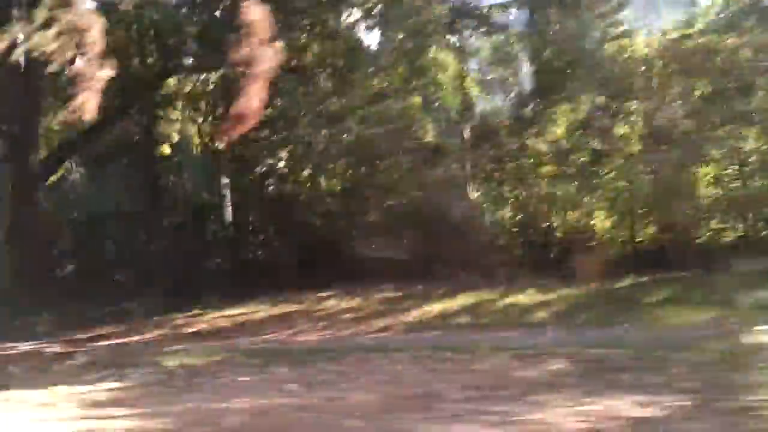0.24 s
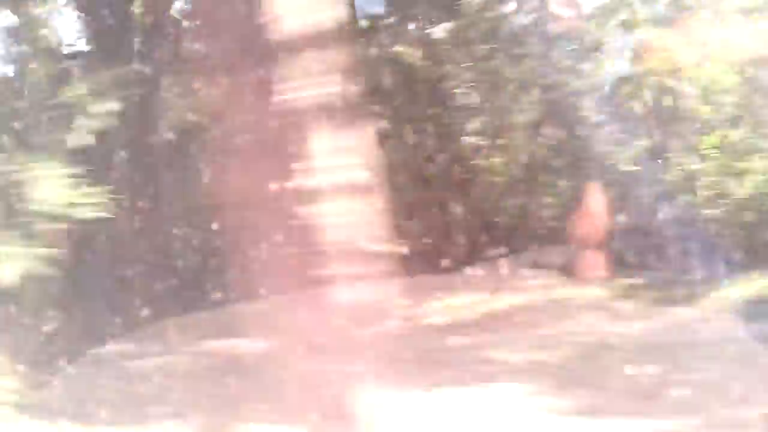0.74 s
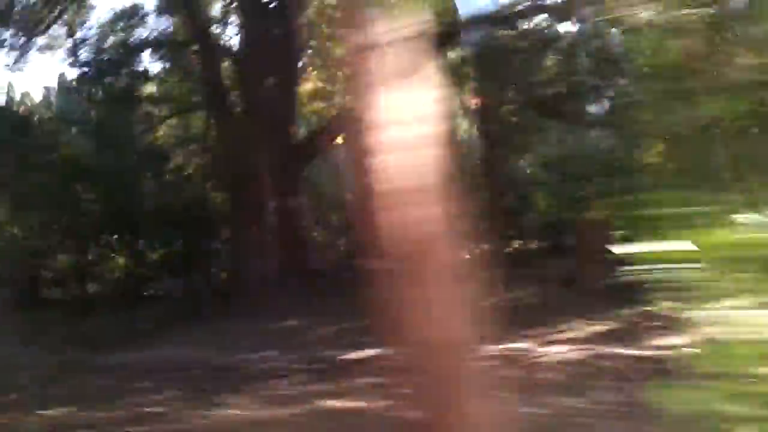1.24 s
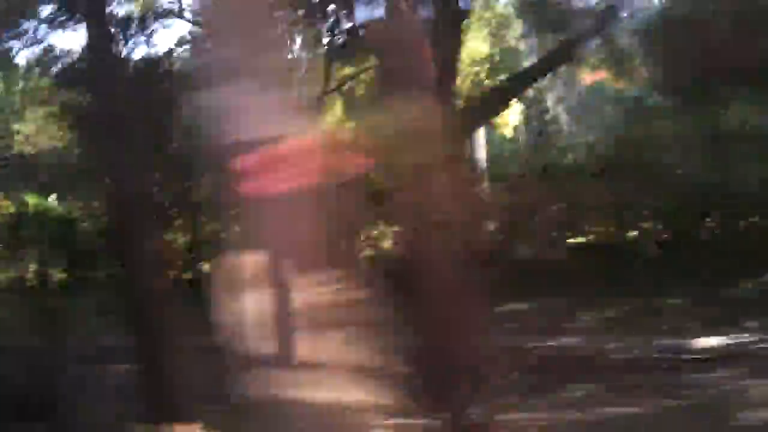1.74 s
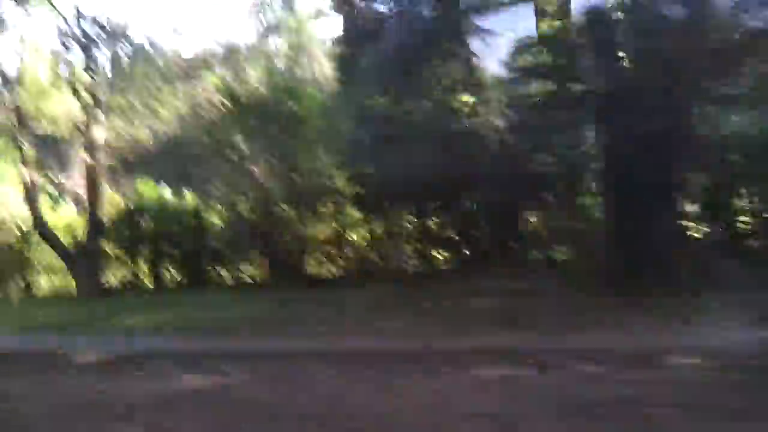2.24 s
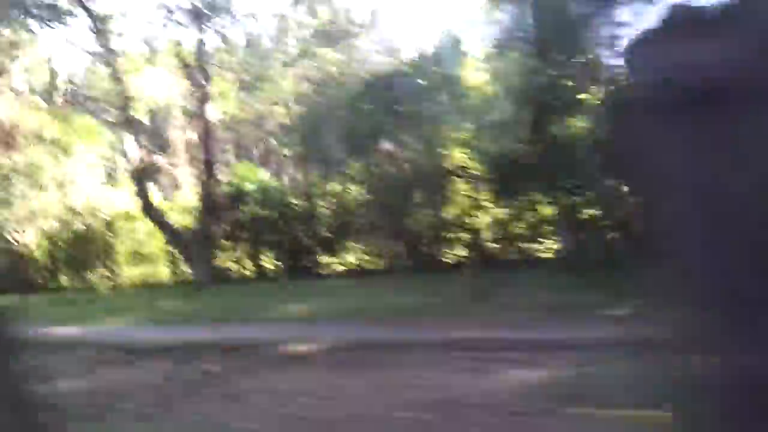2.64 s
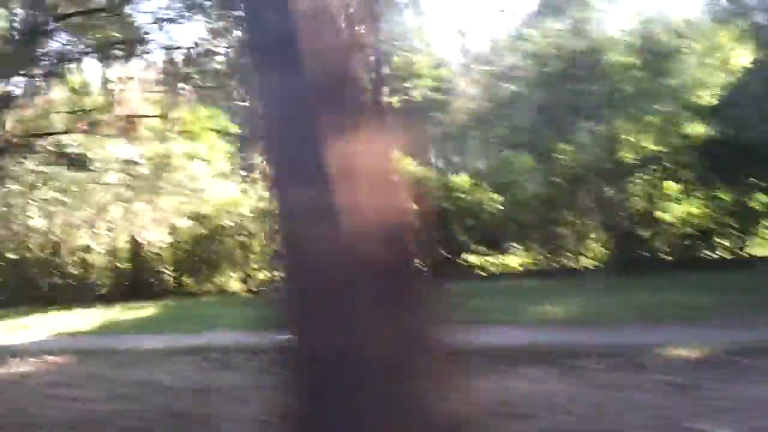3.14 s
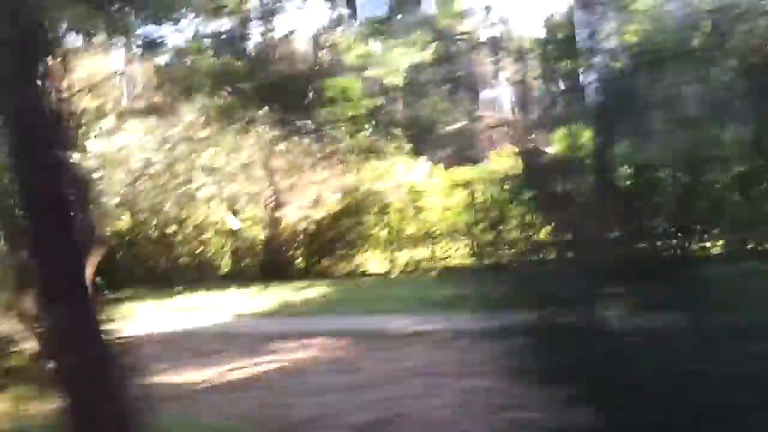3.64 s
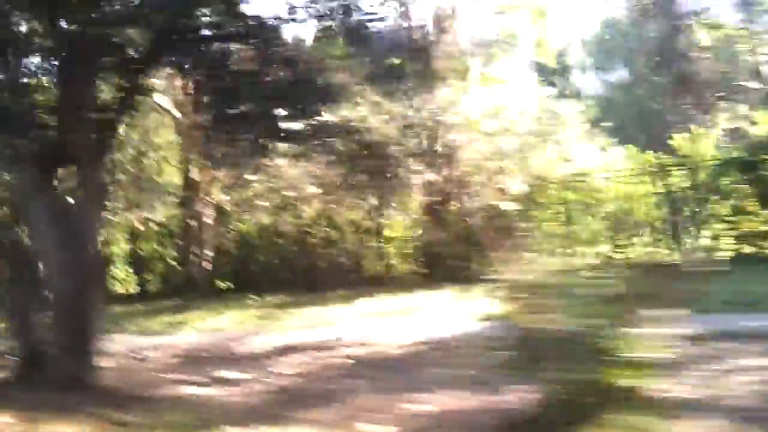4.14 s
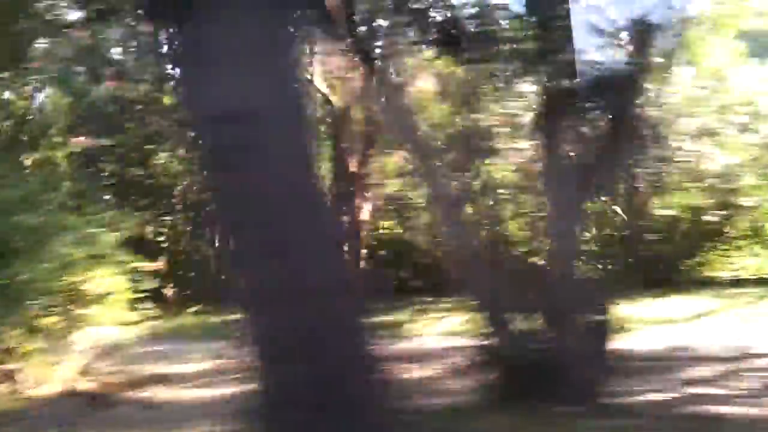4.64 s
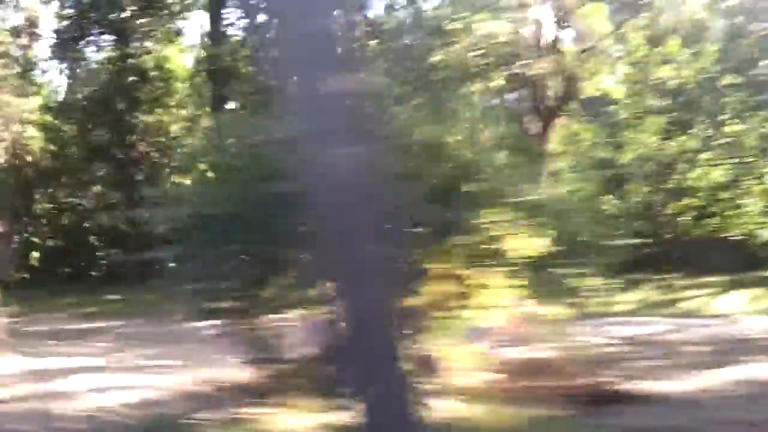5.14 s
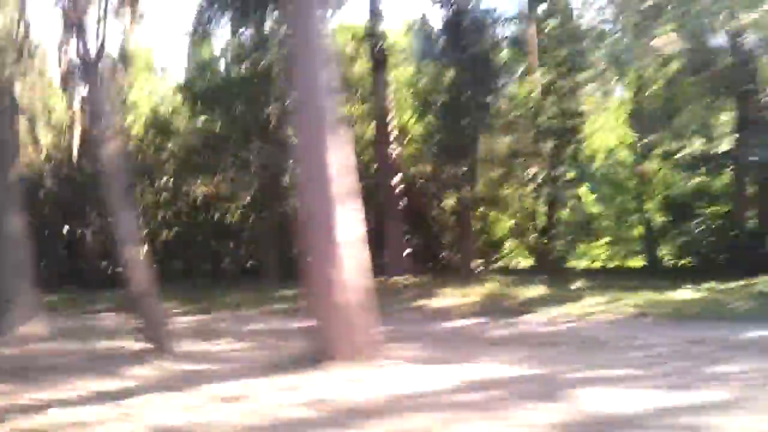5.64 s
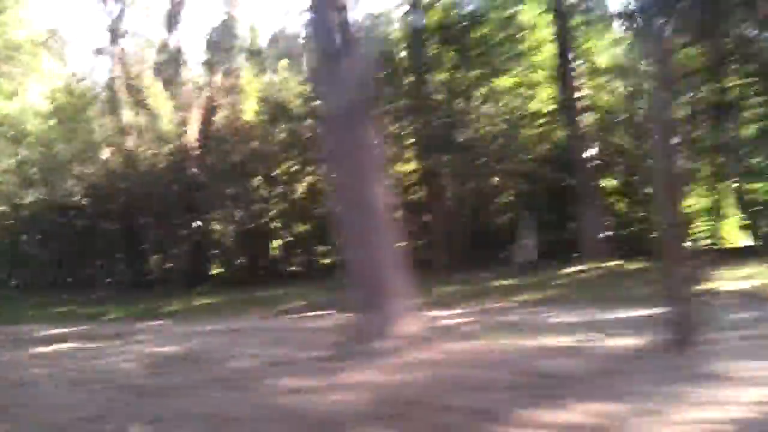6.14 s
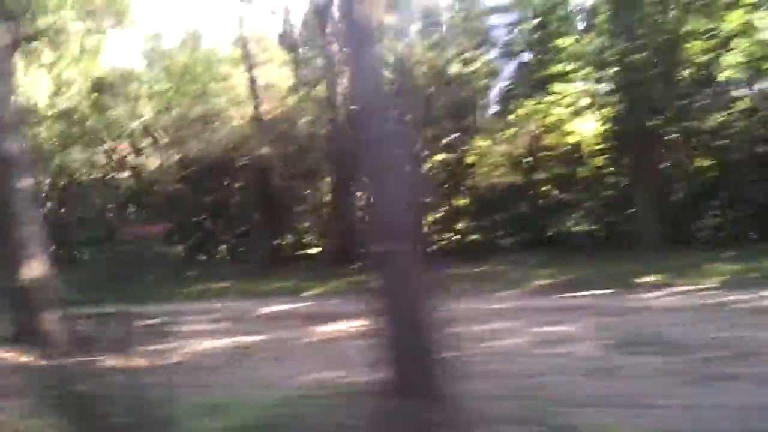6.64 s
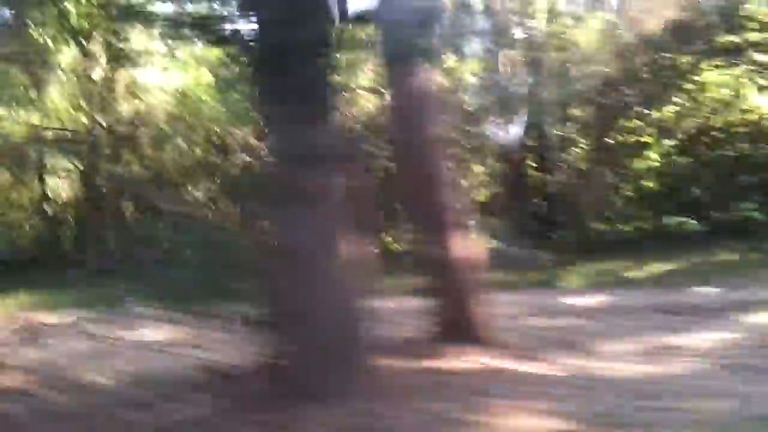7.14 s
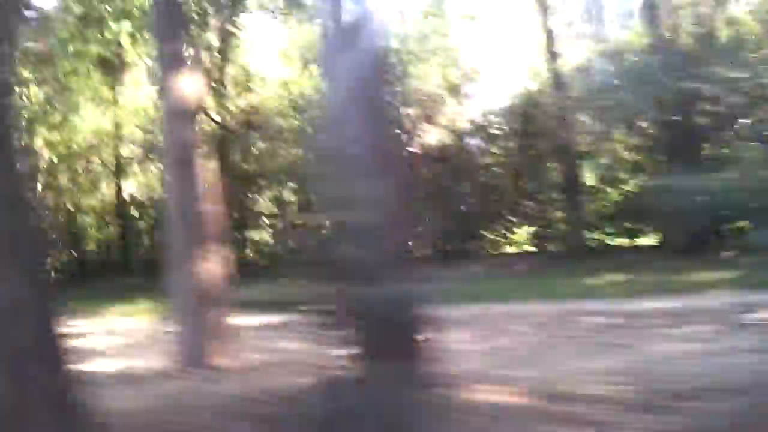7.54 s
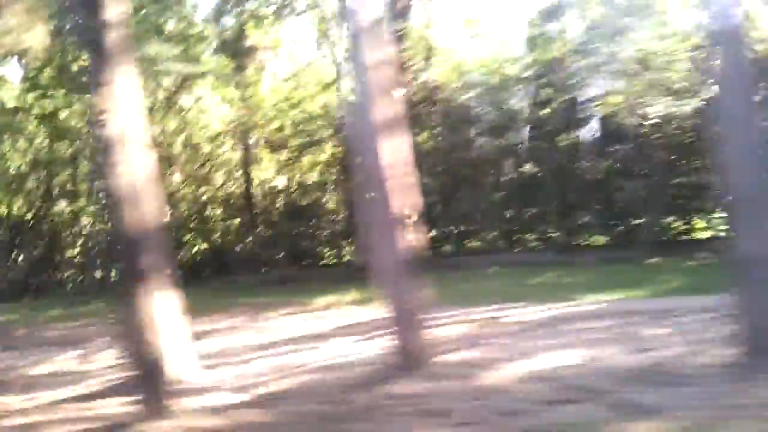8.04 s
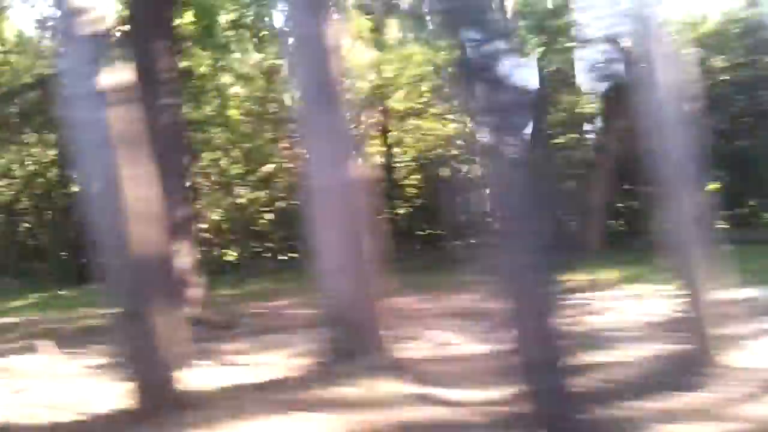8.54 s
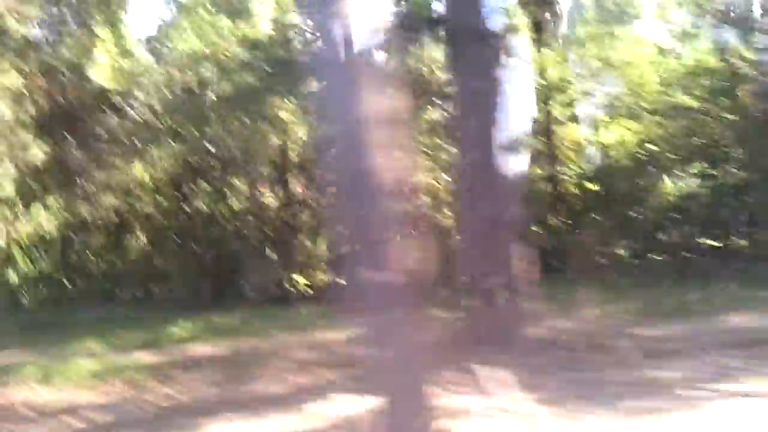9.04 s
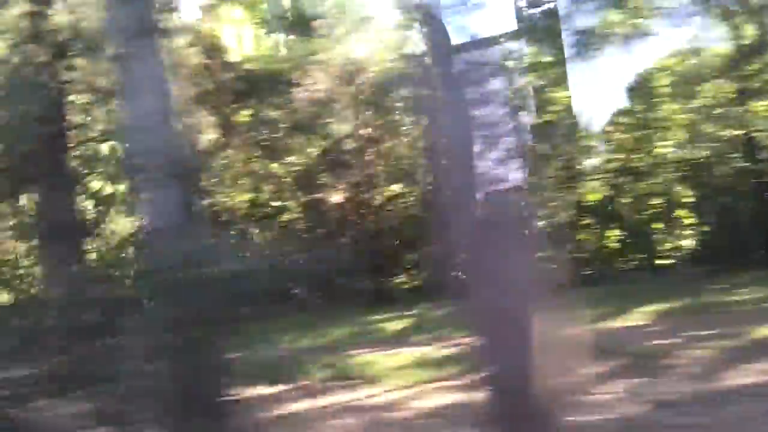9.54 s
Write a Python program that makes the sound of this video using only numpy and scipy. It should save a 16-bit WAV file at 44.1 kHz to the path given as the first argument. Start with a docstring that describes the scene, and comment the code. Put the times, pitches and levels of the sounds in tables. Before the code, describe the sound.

Continuous electric drive hum wavers restlessly, its pitch almost constant, blended with dull road roar in a boxy metal cabin. Irregular soft thuds and quick fluttering rattles run throughout, sheets ringing briefly. Rattling is dense at first, thinner around the middle, bursts hard after five seconds, then settles into lighter knocks, small creaks and occasional glassy ticks. Heard from inside by a small two-port microphone, with no speech.

```python
"""Trolleybus cabin at near-steady speed

The drive hums at multiples of its shaft speed over road rumble in the boxy cabin. About once a wheel turn a thud
booms in the floor and clatters the side walls. Wheel hops, in runs of about ten a second or singly, shake panels
and fittings; sheets ring, parts tick on the window pane, a wall joint creaks and a fitting squeaks now and then.
Tones are sines, knocks and rumble are shaped noise; two microphone ports hear them all."""
import sys
import numpy as np
from scipy import signal
from scipy.fft import rfft, irfft, next_fast_len
from scipy.io import wavfile
from scipy.ndimage import uniform_filter1d

SR = 44100
rng = np.random.default_rng(int(sys.argv[2]) if len(sys.argv) > 2 else 0)


def int16_out(signal):
    """Quantize to a 16-bit WAV file."""
    q = np.round(np.clip(np.atleast_2d(signal).T, -1, 1) * 32767)
    wavfile.write(sys.argv[1], SR, q.astype(np.int16))


N = 430857
FFT_SAMPLES = next_fast_len(N + 4096)
FREQ_HZ = np.fft.rfftfreq(FFT_SAMPLES, 1 / SR)
TIME_S = np.arange(N) / SR

# Drive shaft. Each row: time in seconds, shaft speed in Hz.
SHAFT_SPEED = [(0, 27.8), (.8, 28.29), (1.6, 28.45), (2.2, 28.71), (2.8, 28.62), (3.5, 28.41), (4.1, 28.29),
               (4.6, 28.16), (5.1, 28.36), (6, 28.07), (7, 27.91), (7.5, 28.03), (8.2, 27.99), (9, 28.07),
               (9.77, 27.81)]
# Tone frequency of each drive tone, as a multiple of shaft speed.
SHAFT_MULTIPLES = (6, 8, 12, 15.1, 19, 24.1, 48)
# Level curve each tone follows: 0 is MAIN_HUM, 1 to 4 the level columns of OTHER_TONES.
LEVEL_CURVE = (1, 0, 2, 3, 4, 4, 4)
# How far each tone lies under its curve, in dB.
TONE_BELOW_DB = (0, 0, 0, 0, 6, 0, 15)
# Slow swelling of each tone, in dB.
TONE_SWAY_DB = (1.5, .5, .5, 0, 2, 2.5, 2)
# Share of the wavering each tone takes up, as a factor.
TONE_UNREST = (1.2, .6, .8, .25, .45, .6, 1)
# Main hum level, beating unevenly, in three stretches. Each row: time in seconds, rms in dB before wavering.
MAIN_HUM = [
    [(0.0, -27), (0.04, -24), (0.07, -36), (0.1, -19), (0.12, -25), (0.14, -45), (0.19, -47), (0.25, -23),
     (0.37, -26), (0.39, -38), (0.43, -24), (0.51, -25), (0.58, -44), (0.63, -28.5), (0.99, -25),
     (1.01, -29), (1.04, -17), (1.1, -27), (1.19, -18), (1.27, -29), (1.39, -15), (1.44, -28), (1.47, -16),
     (1.52, -32), (1.57, -16), (1.71, -29), (1.88, -23), (1.95, -14), (1.99, -19.5), (2.14, -15),
     (2.17, -27), (2.26, -17.5), (2.34, -31), (2.43, -20), (2.46, -37), (2.51, -21), (2.76, -18.5),
     (2.81, -29), (2.94, -17.5), (3.0, -18)],
    [(3.04, -23), (3.11, -28), (3.15, -17), (3.35, -29), (3.39, -16), (3.51, -18.5), (3.55, -27),
     (3.65, -12.5), (3.71, -31), (3.77, -12), (3.86, -26), (3.91, -22), (3.96, -32), (4.02, -19.5),
     (4.07, -27.5), (4.2, -19), (4.29, -28), (4.37, -18.5), (4.42, -32), (4.54, -18), (4.56, -24),
     (4.75, -25), (4.8, -19), (4.83, -32), (4.9, -18), (4.97, -18), (5.05, -24), (5.08, -45), (5.14, -27),
     (5.23, -27), (5.29, -21), (5.35, -24), (5.41, -16), (5.46, -28), (5.58, -17), (5.62, -41), (5.64, -24),
     (5.9, -31), (5.96, -18), (6.0, -25)],
    [(6.04, -25), (6.11, -25), (6.17, -43), (6.21, -28), (6.5, -23.5), (6.56, -43), (6.59, -19),
     (6.67, -42), (6.72, -26), (6.91, -22), (6.94, -34), (7.03, -21), (7.15, -32), (7.18, -21), (7.45, -26),
     (7.49, -45), (7.51, -34), (7.67, -28), (7.91, -48), (7.97, -21), (8.03, -28), (8.09, -45), (8.11, -30),
     (8.24, -22), (8.26, -41), (8.34, -21), (8.61, -30.5), (8.75, -44), (8.78, -32), (8.93, -29),
     (8.97, -45), (9.0, -29), (9.2, -27), (9.23, -47), (9.45, -25), (9.49, -45), (9.53, -20), (9.6, -45),
     (9.7, -26), (9.77, -47)],
]
# Levels of the other drive tones, rising and falling unevenly. Each row: time in seconds, then rms in dB
# before wavering of the low hum, the overtone, the lower gear whine and the upper gear whine.
OTHER_TONES = [(0.0, -27, -24, -38, -41), (0.08, -18, -41, -40, -34), (0.11, -21.5, -27, -40, -43),
               (0.46, -23, -34, -33, -38.5), (0.6, -36, -33, -45, -39), (0.65, -29, -27, -36, -38),
               (0.92, -25, -32, -31, -39), (0.98, -38, -31, -36, -38), (1.14, -28, -32, -30, -33),
               (1.22, -32, -21.5, -27, -35), (1.28, -31, -41, -37, -32), (1.36, -32, -24.5, -35, -40),
               (1.5, -24, -39, -28, -32), (1.52, -35, -30, -32, -30), (1.74, -24, -26, -29.5, -30.5),
               (1.85, -36, -31, -34, -40), (1.96, -22, -23, -26, -32), (2.23, -32, -36, -27.5, -42),
               (2.39, -25.5, -21, -25.5, -31), (2.61, -39, -29, -31, -41.5), (2.69, -32, -19.5, -30, -31),
               (2.83, -30, -31, -32, -38), (2.86, -26, -31, -43, -33), (2.91, -42, -41, -31, -33),
               (3.04, -30, -21, -27, -32), (3.13, -34, -29, -26, -30.5), (3.83, -31, -22.5, -28, -31.5),
               (4.08, -43, -30, -31, -37), (4.22, -31, -20, -26, -25), (4.33, -33, -28, -36, -30.5),
               (4.73, -28, -27.5, -32, -34.5), (5.03, -40, -28, -29.5, -31), (5.06, -35, -26, -40, -41),
               (5.12, -28, -33, -42, -37), (5.25, -27, -23, -34, -29), (5.36, -43, -26, -26, -39),
               (5.49, -26, -33, -29, -32), (6.17, -31.5, -28.5, -31, -36), (6.26, -26, -22, -31, -30),
               (6.28, -25.5, -29, -28.5, -35), (6.72, -44, -29, -31.5, -38), (6.88, -30, -25, -33, -33),
               (7.16, -39, -32, -31, -41), (7.21, -25, -25, -26, -28), (7.29, -33, -20, -35, -34),
               (7.4, -31, -32, -31, -41), (7.97, -37.5, -26, -28, -41), (8.03, -31, -21, -28, -28),
               (8.16, -27, -33, -30, -50), (8.3, -35, -22, -31, -35), (8.46, -25, -26.5, -28, -40),
               (8.87, -37, -30, -35, -35), (8.95, -26, -34, -42, -37), (9.09, -35, -24.5, -30, -38),
               (9.22, -27, -30, -40, -37), (9.28, -38, -32, -29, -35), (9.36, -31, -40, -38, -46),
               (9.44, -26, -25, -33, -33), (9.72, -36, -31, -33, -36), (9.77, -26, -34, -36, -49)]

# Thuds, one every wheel turn or so. Each row: time in seconds, floor boom in dB, wall clatter in dB.
THUDS = [(.05, -33, -38), (.44, -22.5, -34.5), (.86, -20, -33), (1.12, -23, -35), (1.35, -23, -33),
         (1.57, -20, -30), (1.95, -16.5, -25), (2.33, -21, -25.5), (2.7, -22, -33.5), (3.0, -16.5, -42),
         (3.45, -16.5, -28.5), (3.75, -21, -34), (3.83, -18.5, -27), (4.17, -15.5, -35.5), (4.26, -37, -33),
         (4.76, -19.5, -36), (5.298, -20, -22.5), (5.38, -22, -31), (5.45, -27, -31.5), (5.53, -22, -38),
         (5.62, -21, -39), (5.72, -26, -34), (5.82, -24, -37), (5.93, -29, -35), (6.21, -21, -31),
         (6.3, -22, -33.5), (6.65, -35, -44), (6.87, -27, -29.5), (7.24, -22, -30), (7.39, -23.5, -34),
         (7.66, -20, -31.5), (7.99, -18, -34), (8.35, -20.5, -31.5), (8.5, -23, -38), (8.8, -40, -34),
         (9.18, -27, -31), (9.55, -21.5, -31.5)]
# Wheel hops at even gaps. Each row: first and last hop in seconds, first and last peak in dB,
# small fittings minus panels in dB at the first and at the last.
HOP_RUNS = [(.079, 0.25, -43, -22.5, -3, -8), (0.446, 0.65, -25, -23, -1, -10),
            (0.768, 0.947, -22, -25, -6, -3), (1.041, 1.14, -19.5, -19, -4, -4),
            (1.246, 1.35, -22.5, -25, -8, -1), (1.531, 1.618, -18, -18.5, -2.5, -3.5),
            (2.198, 2.384, -19, -15, -2, -2), (2.48, 2.575, -18.5, -18.5, -6, -4),
            (2.698, 2.775, -26, -22.5, -3, -4), (2.957, 3.167, -20.5, -24, -6, -17),
            (5.33, 5.44, -15.5, -27, -2, 7), (5.73, 6.02, -21.5, -26.5, -1, 0),
            (6.113, 6.418, -31, -29, 0, -6), (7.188, 7.382, -23, -23, -13, -3.5),
            (7.49, 7.775, -27.5, -29.5, -3, 0), (7.994, 8.09, -34, -30, -6, 1)]
# Single wheel hops and jolts, listed one by one. Each row: time in seconds, peak in dB,
# small fittings minus panels in dB.
SINGLE_HOPS = [(1.445, -21.5, -3), (1.739, -22.5, -8), (1.894, -20.5, -6), (2.029, -22, -6),
               (2.129, -25, -5), (2.89, -25, -12), (2.182, -23, 4.5), (3.469, -27, -18), (3.749, -38, -5),
               (3.833, -19.5, -9), (3.919, -24.5, -2.5), (4.199, -25.5, -8.5), (4.257, -26, -13),
               (4.5, -32, 5), (4.535, -36, 6), (4.578, -39, 4), (4.769, -23.5, -4), (4.909, -28, -3),
               (5.139, -23.5, -11), (5.304, -14, -12), (5.389, -21, -1), (5.525, -19, -1), (5.56, -28, 8),
               (5.625, -18.5, 0.5), (6.619, -25, -17), (6.721, -24, 0), (6.87, -26, -12), (6.91, -25, -8),
               (6.98, -27, -4), (7.02, -22, -9), (8.2, -36, 11), (8.228, -27.5, 9.5), (8.27, -32, 12),
               (8.309, -32, 5), (8.535, -28.5, 4), (9.069, -26.5, -5), (9.205, -25, -4), (9.289, -34, 3),
               (9.458, -25, -8), (9.579, -30, -2)]
# One sheet ringing out. Each row: start in seconds, approximate frequency in Hz, rms in dB.
RINGS = [(.04, 830, -28), (1.95, 760, -32), (2.2, 3350, -41), (2.29, 3350, -43), (2.34, 830, -29),
         (2.4, 3350, -40), (3.02, 335, -23), (3.46, 830, -29), (3.46, 335, -30), (3.83, 335, -15.5),
         (5.31, 1100, -24), (5.44, 150, -27), (5.52, 150, -28), (5.61, 150, -26), (5.71, 150, -28),
         (5.81, 150, -28), (5.33, 3350, -38), (5.42, 3350, -39), (5.52, 3350, -36), (5.63, 3350, -35),
         (5.74, 3350, -42), (6.2, 760, -28), (7.25, 760, -31), (6.55, 1380, -37), (6.63, 830, -26),
         (6.65, 1690, -41), (6.86, 335, -21), (6.87, 1450, -37.5), (7.23, 335, -20), (7.27, 1380, -41),
         (8.0, 335, -17), (8.04, 1450, -39), (8.36, 1450, -35), (8.5, 3350, -38), (8.53, 1380, -39),
         (8.8, 1690, -43), (9.06, 1380, -43), (9.19, 1690, -47), (9.2, 2620, -43), (8.0, 3350, -47),
         (8.08, 3350, -48), (8.84, 3350, -47), (9.21, 3350, -44), (9.31, 2620, -46), (9.57, 3350, -44),
         (9.56, 1690, -40)]
# Sheet-metal modes. Each row: frequency in Hz, width in Hz, level in dB relative to the shaking.
SHEET_MODES = [(150, 61, -8.5), (335, 11.4, -1), (760, 52, -5.5), (830, 28, -15), (1100, 130, -8),
               (1380, 25, -13), (1480, 48, -12), (1690, 60, -13), (2640, 150, -16.5), (3350, 320, -15.5)]
# Hard part knocking on the pane. Each row: start in seconds, peak in dB, centre in Hz,
# spread as log of frequency ratio.
PANE_KNOCKS = [(1.038, -33, 7370, .35), (2.1824, -7, 6850, .6), (2.184, -22, 5440, 0.1),
               (2.3955, -21, 7160, .35), (2.705, -21.5, 6800, 0.43), (3.3019, -32, 9000, 0.45),
               (4.0462, -30, 7960, 0.38), (4.392, -42, 7200, 0.23), (4.582, -28, 8700, 0.094),
               (4.598, -24, 8300, .12), (4.612, -33, 6000, .15), (4.6432, -28, 6960, .3),
               (5.0295, -31, 7230, 0.36), (5.376, -17, 8680, 0.13), (5.4475, -14.5, 9000, 0.3),
               (5.464, -23, 8500, .2), (5.565, -20, 8800, .2), (5.645, -25, 6500, .3),
               (6.096, -27, 9510, .3), (6.3166, -27, 7280, 0.29), (6.7209, -24, 6590, 0.56),
               (8.164, -24, 9300, 0.26), (8.9277, -30, 8390, .17)]
# Pane modes. Each row: frequency in Hz, relative level in dB, t60 in seconds.
PANE_MODES = [(4150, -10, .03), (5400, 0, .045), (6000, -3, .045), (6900, -8, .04), (7400, -5, .04),
              (8400, -7, .035), (8650, -11, .04), (9000, -6, .025), (10500, -7, .022), (11600, -9, .02),
              (13000, -10, .02)]
# Wall joint creaking. Each row: start in seconds, length in seconds, level in dB.
CREAKS = [(4.21, .122, -31), (6.63, .12, -36), (8.06, .07, -37), (8.5, .05, -37), (8.8, .08, -39),
          (9.55, .07, -37)]
# Hollow wall resonances. Each row: frequency in Hz, width in Hz, relative level in dB.
HOLLOW_MODES = [(1050, 66, 7), (1410, 90, 1), (1690, 61, 0), (2280, 200, -11), (3300, 230, -10)]
# Fitting squeaking. Each row: start in seconds, length in seconds, frequency in Hz, level in dB.
SQUEAKS = [(5.35, .06, 9550, -34), (5.4, .04, 9560, -44), (5.56, .06, 9540, -41)]
# Road. Each row: time in seconds, cabin boom in dB, steady shaking of the fittings as a reference in dB.
ROAD = [(0, -22, -31), (.24, -20, -34), (.6, -21, -35.5), (1.11, -21, -37), (1.57, -21.5, -34.5),
        (1.9, -24.5, -33.5), (2.09, -18.5, -33.5), (2.39, -18, -31), (2.56, -22, -35), (2.9, -21.5, -35),
        (3.13, -21.5, -40), (3.35, -21.5, -35.5), (3.5, -19.5, -37.5), (3.73, -20, -34.5),
        (4.3, -24.5, -39), (4.73, -20, -34.5), (5.08, -23, -37), (5.25, -21, -35), (5.39, -17.5, -28),
        (5.6, -15, -30), (5.9, -21, -32), (6.15, -25, -38.5), (6.4, -24, -38.5), (6.65, -23, -37.5),
        (6.95, -21.5, -35.5), (7.242, -21.5, -36), (7.55, -24, -37.5), (7.9, -23.5, -38),
        (8.15, -24.5, -36), (8.43, -18.5, -32.5), (8.6, -22, -37), (8.95, -24, -37.5), (9.35, -22.5, -39),
        (9.77, -25, -37.5)]
# Body heaving on its springs over a dip. Each row: start in seconds, peak in dB.
HEAVES = [(.45, -37), (1.45, -42), (2.15, -41), (4.8, -30), (5.35, -31), (5.8, -32.5), (6.75, -48),
          (7.27, -35.5), (8.08, -35), (9.3, -41)]

# Spectra, relative only. Each row: frequency in Hz, level in dB per Hz.
HEAVE_SPECTRUM = [(20, -37), (40, -14), (60, 5.5), (100, 2.5), (140, -31), (250, -58)]
BOOM_SPECTRUM = [(60, -38), (100, -18), (130, -8), (170, -8.5), (250, -1.5), (340, -3.5), (450, -9),
                 (600, -20), (1000, -90)]
ROAR_SPECTRUM = [(250, -35), (400, -1.5), (520, -0.5), (700, 0.5), (850, -4.5), (1020, -7), (1260, -14),
                 (2400, -22), (5000, -95)]
FLOOR_SPECTRUM = [(60, -30), (150, 5), (250, 7.5), (330, 13), (450, 9.5), (600, 1), (1000, -70)]
WALL_SPECTRUM = [(300, -36), (600, 2), (800, 1), (1100, -8), (1700, -13.5), (2500, -13.5), (5000, -68)]
PANEL_SPECTRUM = [(700, -11), (1700, -2), (2350, -8.5), (2900, -3.5), (3400, -2.5), (4500, -7),
                  (6000, -10.5), (10000, -43)]
FITTING_SPECTRUM = [(2500, -11.5), (4500, -2.5), (5600, -2.5), (7000, 3), (9500, -5), (11500, -17),
                    (14800, -31)]
TREBLE_SPECTRUM = [(6000, -25), (9000, -11), (11000, 3), (13000, 2), (14800, -10)]
# Two microphone ports. Each row: frequency in Hz, likeness 0 to 1, lead of the right in radians,
# left minus right in dB.
PORTS = [(43, 1, 0.5, 8), (130, 1, 0.3, 4), (230, 1, 0.46, 3.5), (335, 0.85, 0.4, 3),
         (464, 0.86, 0.68, 0.5), (540, 0.94, 0.96, 0), (720, 0.96, 0.5, 2.5), (816, 0.7, 0, 6),
         (937, 0.16, 0.3, -3.5), (990, 0.32, -2.5, 4), (1500, 0.24, -3.5, 1), (2050, 0, -4, -4),
         (2610, 0.1, -4.5, 2.5), (3450, 0.4, 1, 1.5), (6960, 0, 1.5, 3), (13600, 0.1, -23, 9)]

# Harder thuds die away more slowly.
THUD_RISE_S, THUD_T60_S, LONGER_S_PER_DB, SOFT_THUD_DB = 0.032, 0.34, 0.0138, -37
CLATTER_RISE_S = 0.026
HOP_HZ = 10.3
CREST_DB = 12.5  # peak of a burst of knocks above its rms
SHAKE_RISE_S, SHAKE_T60_S = 0.015, 0.47
RING_RISE_S, RING_T60_S = 0.045, 0.45
HEAVE_CALM_DB, HEAVE_RISE_S, HEAVE_T60_S = -40, 0.12, 1.2
# Roar rises with the boom, less steeply.
CALM_BOOM_DB, CALM_ROAR_DB, ROAR_DB_PER_BOOM_DB = -21, -27, 0.78
TOP_HZ = 14700


def undb(db):
    """Decibels to gain."""
    return 10 ** (np.asarray(db) / 20)


def along(table, column):
    """Column of a table, interpolated over log frequency."""
    rows = np.array(table)
    return np.interp(np.log(FREQ_HZ + 1), np.log(rows[:, 0]), rows[:, column])


def colour(x, spectrum):
    """Filter by a spectrum, then scale to rms 1."""
    y = irfft(rfft(x, FFT_SAMPLES) * undb(along(spectrum, 1)), FFT_SAMPLES)[..., :N]
    return y / np.sqrt(np.mean(y ** 2))


def noise():
    """White noise along two unrelated paths."""
    return rng.standard_normal((2, N))


def walk(rate_hz):
    """Random levels held 1 / rate_hz, smoothed twice; spread near 1."""
    coarse_s = TIME_S[::32]
    hold = max(int(len(coarse_s) / TIME_S[-1] / rate_hz), 1)
    held = np.repeat(rng.standard_normal(len(coarse_s) // hold + 1), hold)
    smooth = uniform_filter1d(uniform_filter1d(held, hold), hold)[:len(coarse_s)]
    return np.interp(TIME_S, coarse_s, 1.266 * smooth)


def bursts(start_s, peak_db, rise_s, t60_s):
    """Power sum of swells that rise smoothly and die away exponentially."""
    power = np.zeros(N)
    for start, peak, rise, t60 in np.broadcast(start_s, peak_db, rise_s, t60_s):
        first = max(int(start * SR), 0)
        t = TIME_S[first:first + int((rise + t60) * SR)] - start
        onset = np.sin(np.clip(t / rise, 0, 1) * np.pi / 2) ** 2
        decay_db = 60 * np.maximum(t - rise, 0) / t60
        power[first:first + len(t)] += undb(2 * (peak - decay_db)) * onset
    return np.sqrt(power)


def chatter(knocks_per_s, scatter_db, smear_s):
    """Dense uneven knocks, each smeared by the cabin into decaying noise on two unrelated paths."""
    knock_power = undb(2 * scatter_db * rng.uniform(-0.72, 1, N))
    knocks = (rng.random(N) < knocks_per_s / SR) * knock_power
    fade = np.exp(-1 / (smear_s * SR))
    return np.sqrt(signal.lfilter([1], [1, -fade], knocks)) * noise()


def drive(waver_db=2., wobble_cycles=.075, shudder_turns=.0045):
    """Gear and motor tones lock to the shaft; level and phase waver at random."""
    shaft_hz = np.interp(TIME_S, *np.transpose(SHAFT_SPEED))
    s, *columns = np.transpose(OTHER_TONES)
    levels_db = [np.interp(TIME_S, *np.vstack(MAIN_HUM).T)]
    levels_db += [np.interp(TIME_S, s, column) for column in columns]
    turns = np.cumsum(shaft_hz) / SR
    twist = shudder_turns * walk(30)  # blurs high multiples most
    out = 0
    tones = zip(SHAFT_MULTIPLES, LEVEL_CURVE, TONE_BELOW_DB, TONE_SWAY_DB, TONE_UNREST)
    for multiple, curve, below_db, sway_db, unrest in tones:
        path_slip = np.array([0 * TIME_S, 2 * walk(4)])  # second path slips against the first
        wobble = unrest * wobble_cycles * walk(18)
        cycles = multiple * (turns + unrest * twist) + wobble + path_slip
        db = levels_db[curve] - below_db + unrest * waver_db * walk(20) + sway_db * walk(9)
        out = out + np.sqrt(2) * undb(db) * np.sin(2 * np.pi * cycles)
    return out


def thuds():
    """Each thud booms the floor, clatters the side walls and shakes their sheet modes."""
    s, floor_db, wall_db = np.transpose(THUDS)
    t60_s = THUD_T60_S + LONGER_S_PER_DB * np.maximum(floor_db - SOFT_THUD_DB, 0)
    floor = bursts(s, floor_db, THUD_RISE_S, t60_s) * colour(noise(), FLOOR_SPECTRUM)
    wall_size = bursts(s, wall_db, CLATTER_RISE_S, 1.34 * t60_s)
    walls = wall_size * colour(chatter(660, 5.0, 0.022), WALL_SPECTRUM)
    return floor + walls + sheets(np.hypot(wall_size, undb(-45.0)))


def sheets(shake, patchy_db=2.5):
    """Sheet-metal modes resonate to the shaking in patches; some also ring out alone."""
    s, ring_hz, ring_db = np.transpose(RINGS)
    mode_hz = np.array(SHEET_MODES)[:, 0]
    nearest = np.abs(np.log(ring_hz[:, None] / mode_hz)).argmin(axis=1)
    out = 0
    for k, (hz, width_hz, db) in enumerate(SHEET_MODES):
        mode = signal.lfilter(*signal.iirpeak(hz, hz / width_hz, SR), noise())
        own = nearest == k
        shaken = shake * undb(db + patchy_db * walk(9))
        ringing = bursts(s[own], ring_db[own], RING_RISE_S, RING_T60_S)
        out = out + np.hypot(shaken, ringing) * mode / mode.std()
    return out


def shakes():
    """Hops of every run, then the single ones: rows of seconds, peak dB, fittings minus panels dB."""
    runs = []
    for run in HOP_RUNS:
        hops = 1 + round((run[1] - run[0]) * HOP_HZ)
        runs.append(np.linspace(run[0::2], run[1::2], hops))
    return np.vstack(runs + [SINGLE_HOPS])


def rattle(steady_db):
    """Panels rattle low, small fittings high; both chatter steadily and burst at each hop or jolt."""
    s, peak_db, high_db = shakes().T
    panel_db = peak_db - CREST_DB
    panel_bursts = bursts(s, panel_db, SHAKE_RISE_S, SHAKE_T60_S)
    fitting_bursts = bursts(s, panel_db + high_db, 1.1 * SHAKE_RISE_S, 0.79 * SHAKE_T60_S)
    panel_size = np.hypot(undb(steady_db - 4.0), panel_bursts)
    fitting_size = np.hypot(undb(steady_db - 8.0), fitting_bursts)
    panels = panel_size * colour(chatter(1200, 11.0, 0.014), PANEL_SPECTRUM)
    fittings = fitting_size * colour(chatter(900, 4.2, 0.0085), FITTING_SPECTRUM)
    # very high layer grows steeply with fitting level, smoothed over time
    treble_size = undb(8.0) * signal.lfilter([.0004], [1, -.9996], fitting_size ** 1.7)
    treble = treble_size * colour(chatter(260, 8., .004), TREBLE_SPECTRUM)
    return panels + fittings + treble


def ticks(crack_t60_s=.022, crack_db=2.):
    """A brief noise crack, with pane modes ringing near the centre of the blow."""
    out, t = np.zeros((2, N)), TIME_S[:3000]
    hz, mode_db, t60_s = np.transpose(PANE_MODES)[:, :, None]
    for s, peak_db, centre_hz, spread in PANE_KNOCKS:
        crack = rng.standard_normal((2, len(t))) * undb(crack_db - 60 * t / crack_t60_s)
        band_hz = centre_hz * np.exp([-spread, spread])
        band = signal.butter(2, band_hz, "band", fs=SR, output="sos")
        share = undb(mode_db - 60 * t / t60_s) * np.exp(-(np.log(hz / centre_hz) / spread) ** 2)
        start_turn = rng.random((2, len(PANE_MODES), 1))
        ring = np.sum(share * np.sin(2 * np.pi * (hz * t + start_turn)), axis=1)
        blow = signal.sosfilt(band, crack) + ring
        first = int(s * SR)
        out[:, first:first + len(t)] += undb(peak_db) * blow / np.abs(blow).max()
    return out


def creaks(slips_per_s=260, stop_s=.006):
    """Uneven slips ring the hollow wall, swell, and stop short."""
    size = 0
    for s, length_s, db in CREAKS:
        swell = np.clip((TIME_S - s) / length_s, 0, 1) ** .5
        stop = np.clip((s + length_s - TIME_S) / stop_s, 0, 1)
        size = size + undb(db) * swell * stop
    slips = chatter(slips_per_s, 4., 0.0024)
    ring = 0
    for hz, width_hz, db in HOLLOW_MODES:
        mode = signal.lfilter(*signal.iirpeak(hz, hz / width_hz, SR), slips)
        ring = ring + undb(db) * mode / np.sqrt(width_hz)
    return size * ring / ring.std()


def squeaks():
    """Stick-slip on one high mode: a thin tone stuttering in level and pitch."""
    out = 0
    for s, length_s, hz, db in SQUEAKS:
        shape = np.sin(np.clip((TIME_S - s) / length_s, 0, 1) * np.pi) ** .5
        cycles = hz * TIME_S + 70 * np.cumsum(walk(400)) / SR + rng.random((2, 1))
        out = out + shape * undb(db + 5 * walk(200)) * np.sin(2 * np.pi * cycles)
    return out


def rumble(boom_db):
    """Tyres on coarse tarmac: springs heave, cabin booms, tread roars; boom and roar flutter apart."""
    heave_size = np.hypot(undb(HEAVE_CALM_DB), bursts(*np.transpose(HEAVES), HEAVE_RISE_S, HEAVE_T60_S))
    heave = heave_size * colour(noise(), HEAVE_SPECTRUM)
    boom = undb(boom_db + 1.5 * walk(9)) * colour(noise(), BOOM_SPECTRUM)
    roar_db = CALM_ROAR_DB + ROAR_DB_PER_BOOM_DB * (boom_db - CALM_BOOM_DB)
    roar = undb(roar_db + 1.25 * walk(9)) * colour(noise(), ROAR_SPECTRUM)
    return heave + boom + roar


def scene():
    """Sum of all sources, each along two paths through the cabin."""
    s, boom_db, shake_db = np.transpose(ROAD)
    structure = thuds() + rattle(np.interp(TIME_S, s, shake_db))
    details = ticks() + creaks() + squeaks()
    return drive() + structure + details + rumble(np.interp(TIME_S, s, boom_db))


def record(dry):
    """Two ports a hand apart hear bass alike, treble apart; peaks are rounded and the top is cut."""
    first, second = rfft(dry, FFT_SAMPLES)
    like, lead_rad = np.clip(along(PORTS, 1), 0, 1), along(PORTS, 2)
    tilt = undb(along(PORTS, 3) / 2)
    right = like * np.exp(1j * lead_rad) * first + np.sqrt(1 - like ** 2) * second
    # unlike ports add up weakly, so each is raised
    port_gain = np.sqrt(2 / (1 + like * np.cos(lead_rad)))
    pair = irfft(np.array([first * tilt, right / tilt]) * port_gain, FFT_SAMPLES)[:, :N]
    rounded = np.tanh(0.65 * pair) / 0.66
    return signal.sosfilt(signal.ellip(10, .2, 80, TOP_HZ, fs=SR, output="sos"), rounded)


dry = scene()
out = record(dry)
int16_out(out)
```